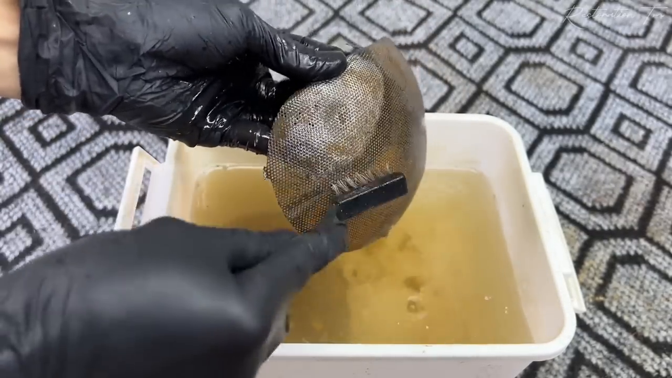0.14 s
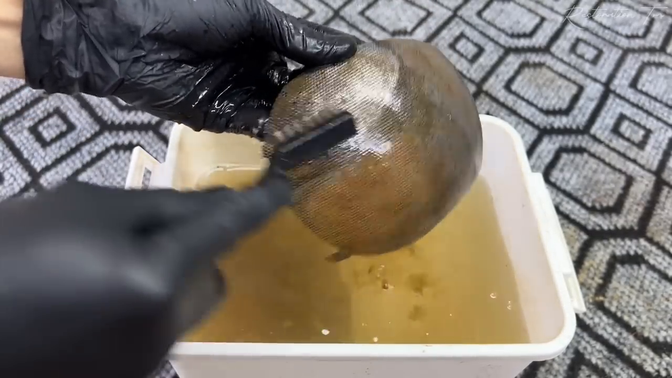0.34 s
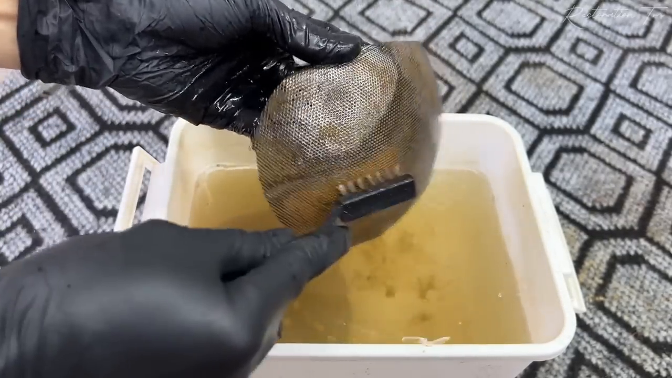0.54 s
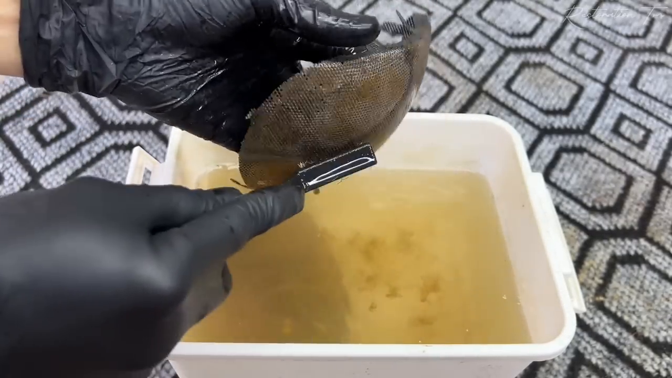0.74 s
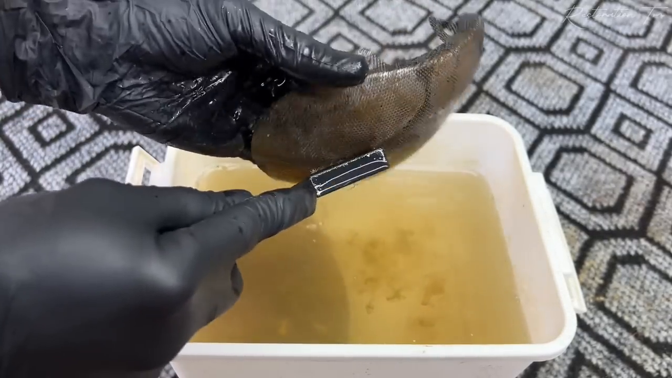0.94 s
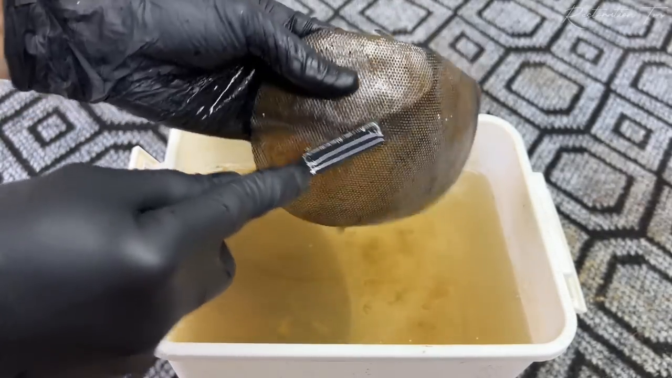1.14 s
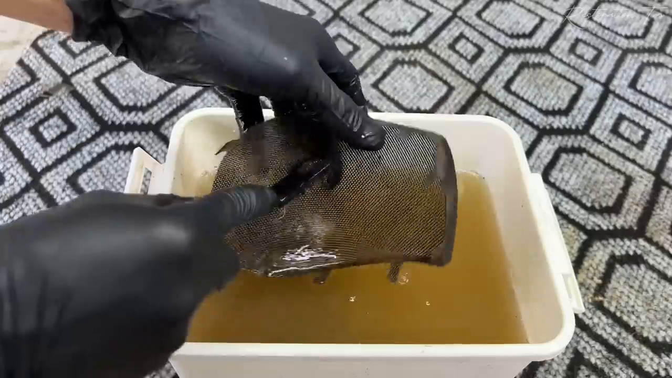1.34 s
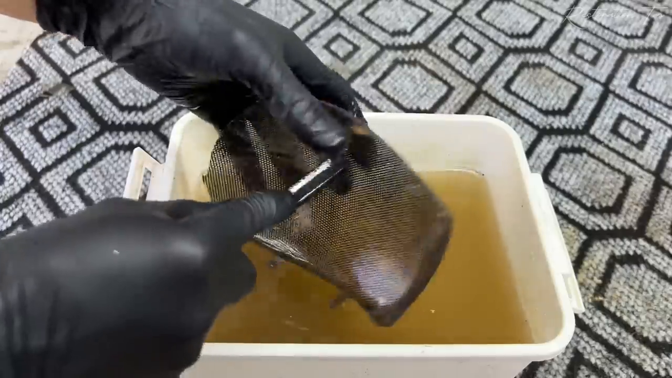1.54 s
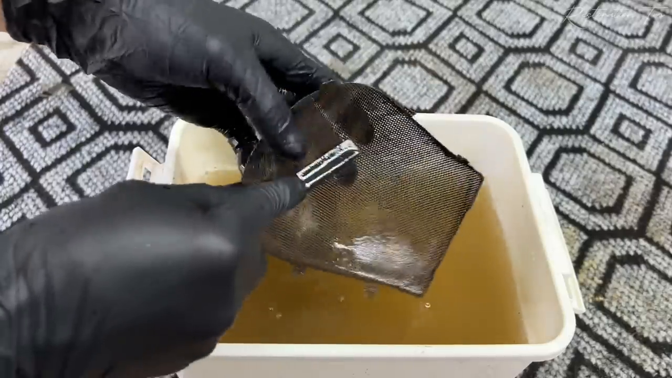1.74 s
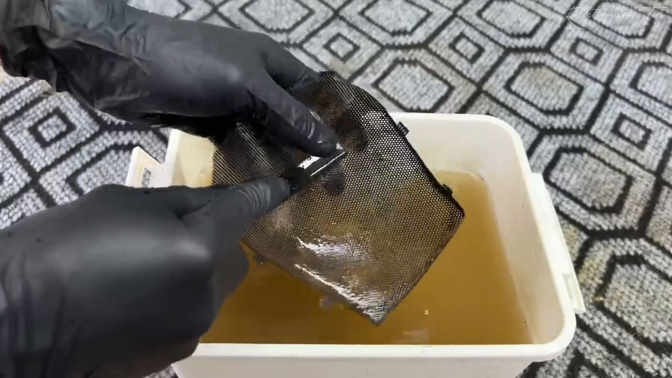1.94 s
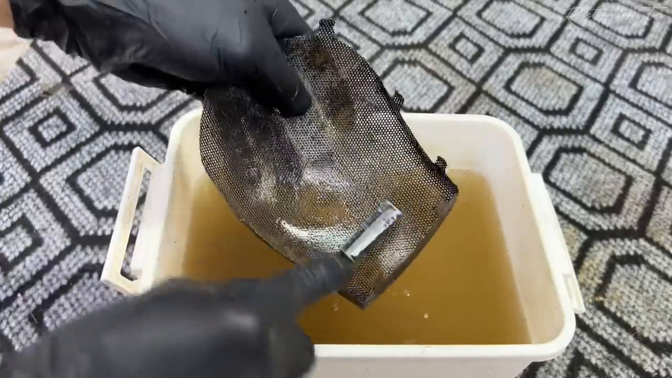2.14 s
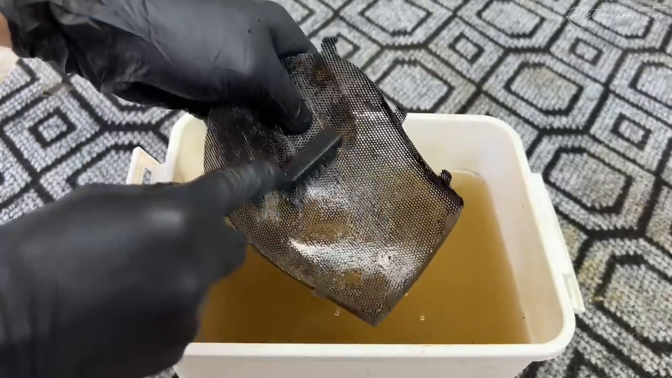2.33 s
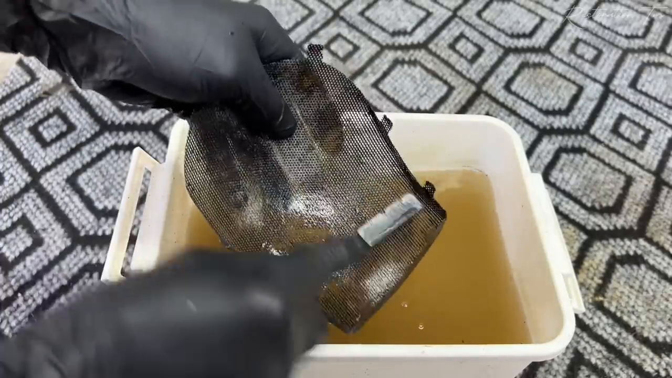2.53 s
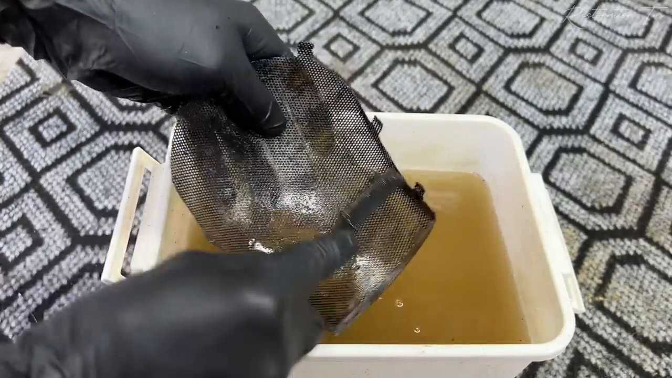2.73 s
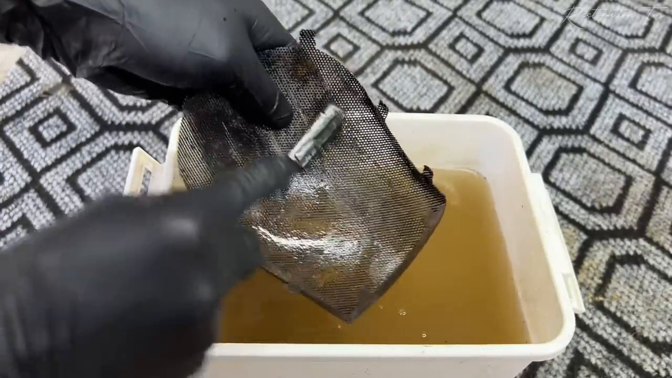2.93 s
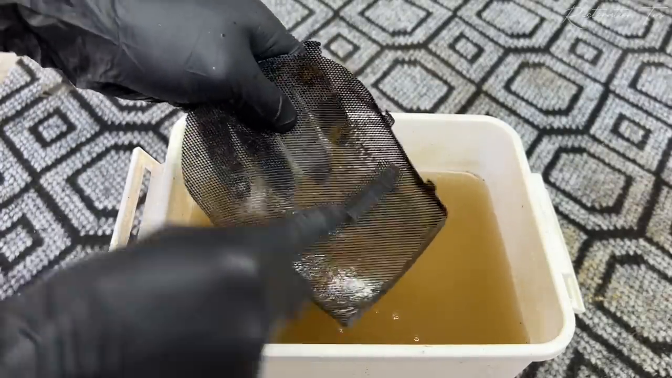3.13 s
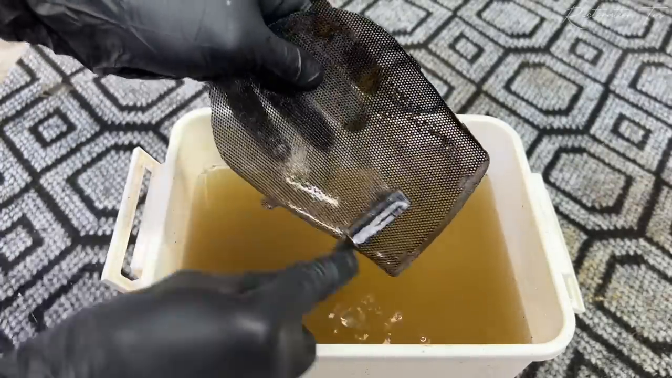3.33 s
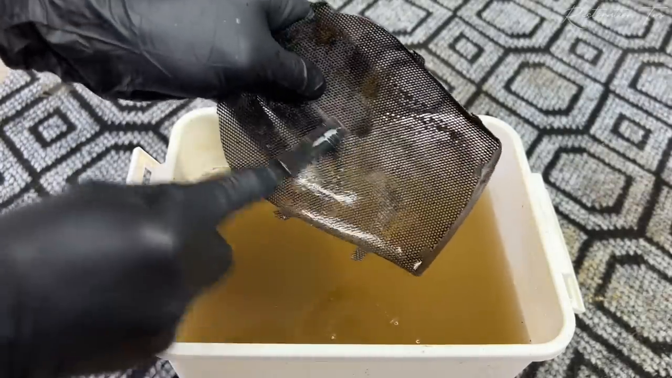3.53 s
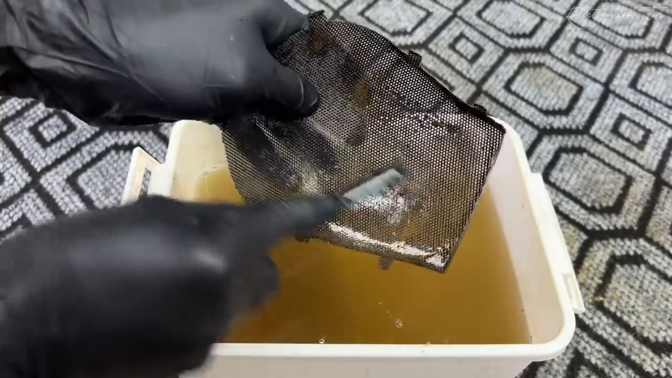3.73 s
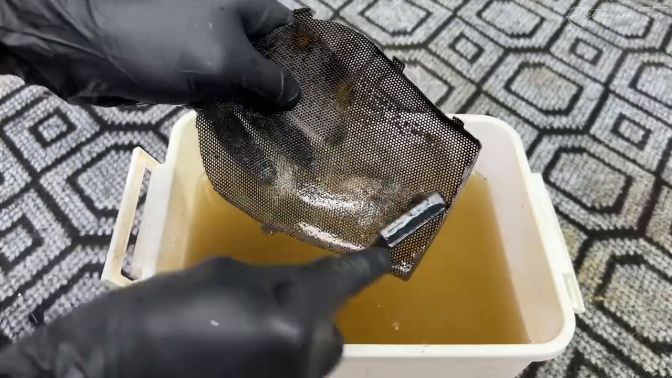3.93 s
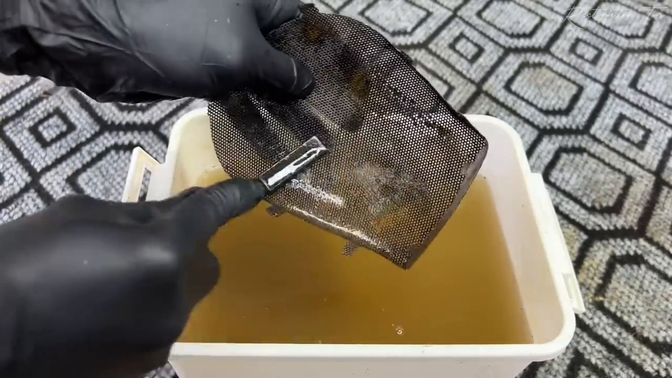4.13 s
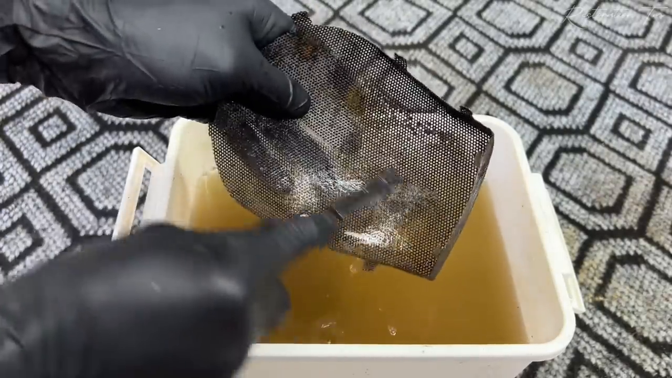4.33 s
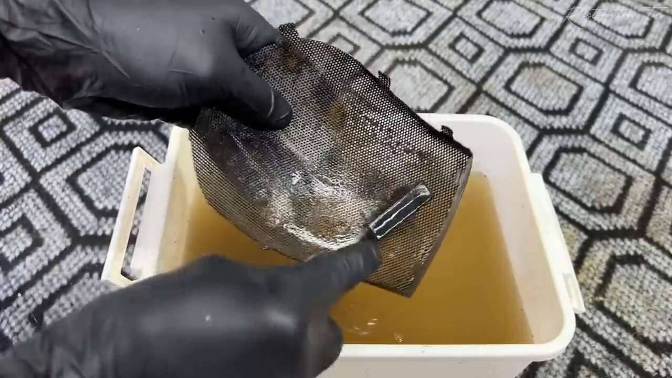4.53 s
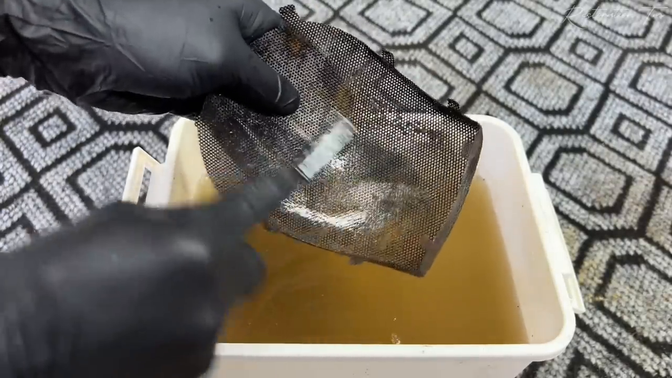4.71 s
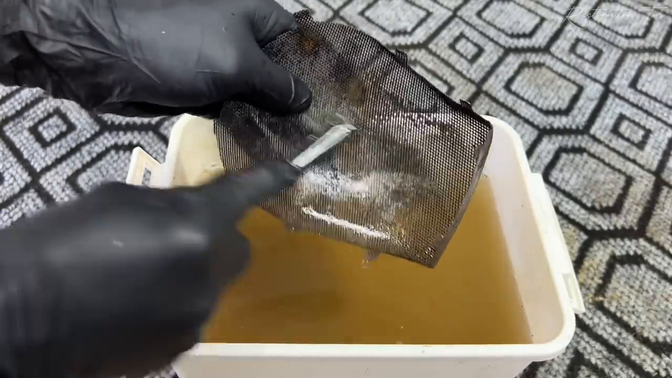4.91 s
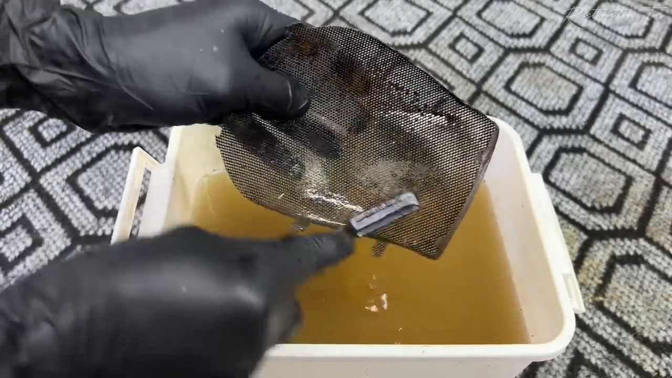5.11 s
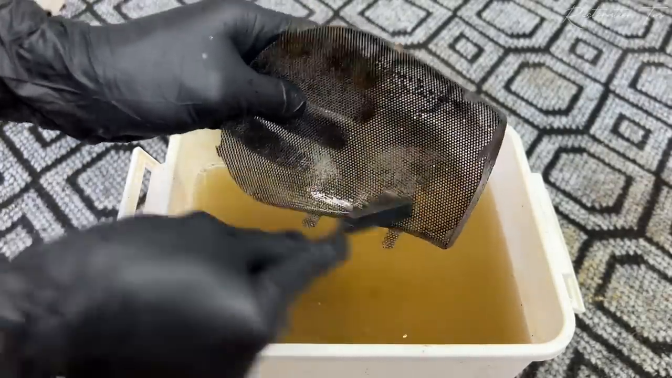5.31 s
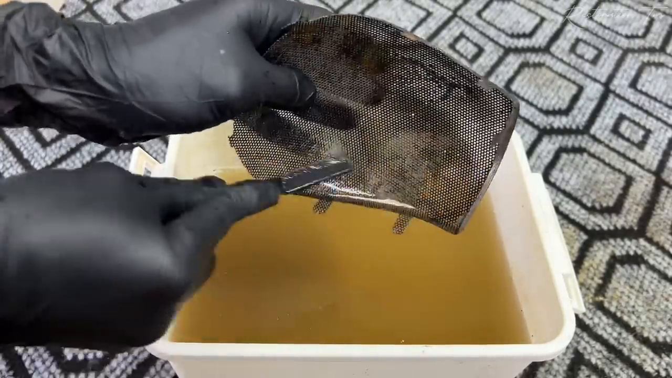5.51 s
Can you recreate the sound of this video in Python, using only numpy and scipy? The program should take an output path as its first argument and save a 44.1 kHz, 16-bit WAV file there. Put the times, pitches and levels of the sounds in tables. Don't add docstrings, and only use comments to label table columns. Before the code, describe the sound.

Bristles scrape wet wire mesh right beside the microphone: a few firm swishes, a lull of light touches and ticks with a tiny dropout, then a steady rapid back-and-forth rasp to the end. Each stroke is a thin, sizzling metallic burst with lower wet scrape underneath and sparse brush taps. Low steady hum and soft air fill the indoor background, with no obvious echo.

```python
import sys
import numpy as np
from scipy import signal
from scipy.fft import rfft, irfft, dct, next_fast_len
from scipy.io import wavfile
from scipy.ndimage import uniform_filter1d

SR = 44100
rng = np.random.default_rng(int(sys.argv[2]) if len(sys.argv) > 2 else 0)


def pcm_store(signal):
    levels = np.round(np.clip(np.atleast_2d(signal), -1, 1) * 32767)
    wavfile.write(sys.argv[1], SR, levels.astype(np.int16).T)


def convert_level_to_amplitude(level_db):
    exponent = np.asarray(level_db, float) / 20
    return 10 ** exponent


N = 245195
TIME = np.arange(N) / SR

# (time [s], level [dB])
MOTOR_HUM = [(0, -42.5), (.5, -44), (.82, -48), (1.25, -45), (1.4, -45.5), (1.7, -46.5), (2.3, -44),
             (2.45, -45.5), (2.75, -35.5), (3.05, -35), (3.41, -40), (3.67, -45.5), (3.81, -40),
             (3.92, -46.5), (4.17, -40), (4.6, -38.5), (5.25, -43.5), (5.56, -46)]
# (frequency [Hz], width [Hz], level [dB])
MOTOR_OVERTONES = [(149.9, 10, -57), (195.4, 40.5, -54), (263, 23, -58.5), (463.4, 22, -65.5),
                   (552, 21, -88)]
# (time [s], deeper engine level [dB], higher engine level [dB])
ENGINES = [(0, -49, -52.5), (1.2, -52.5, -48), (1.45, -46, -50), (2.2, -46.5, -47), (2.5, -51, -42.5),
           (2.8, -43.5, -47), (3.05, -44, -51), (3.45, -47.5, -44.5), (4.0, -42.5, -48.5),
           (4.6, -47.5, -40.5), (5.4, -40.5, -41.5)]
# (frequency [Hz], level per Hz [dB])
AIR_COLOUR = [(82, -31), (140, -2.5), (207, -6.5), (233, -33), (296, -3), (507, -15), (554, -12),
              (704, -17), (3600, -30), (5000, -33), (6500, -32), (11000, -120)]
# (time [s], level [dB], ring [Hz], second ring [Hz], time to fall 60 dB [s])
BRUSH_KNOCKS = [(.005, -38, 262, 205, 0.26), (1.249, -53, 1250, 3600, 0.026),
                (1.263, -40, 1235, 1290, 0.12), (1.2637, -45, 3790, 3640, .09),
                (1.264, -51, 4580, 4240, .12), (1.263, -44, 5400, 4900, .09), (1.266, -53, 2622, 3450, .1),
                (1.462, -46, 2900, 2520, 0.014), (1.595, -59, 1310, 5330, .03),
                (1.7, -53.5, 3900, 4500, 0.017), (2.7, -38.5, 2360, 3760, 0.079),
                (3.155, -40, 957, 788, 0.066), (3.742, -43, 2430, 1500, 0.083),
                (3.9134, -31.5, 1800, 2120, 0.06)]
# (time [s], level [dB])
BRISTLE_FLICKS = [(.33, -22), (.715, -49), (.787, -28.5), (.66, -45), (.884, -40), (.937, -46),
                  (1.041, -32), (1.164, -30), (1.263, -40), (1.395, -45), (1.473, -40), (1.492, -38),
                  (1.51, -40), (1.595, -33), (1.65, -32), (1.706, -42), (1.841, -41), (1.941, -47),
                  (2.7, -37.5), (3.241, -24), (3.399, -31), (3.527, -27), (3.698, -33), (3.71, -32),
                  (3.7405, -28), (3.9136, -21), (4.709, -30), (4.844, -35), (5.414, -29)]
# (time [s], level [dB])
EDGE_TAPS = [
    (3.7407, -35),
    (3.9139, -22),
]
# (time [s], wet scrape level [dB], brighter rasp over the scrape [dB])
FRAME_BITES = [(.07, -45.5, -5.5), (.13, -49, 1), (0.248, -48, 0.5), (0.398, -47.5, 0), (1.189, -54.5, 2),
               (1.47, -78, 12), (2.082, -50.5, -8), (2.29, -48, -19), (2.39, -50, -22), (2.571, -49, -4.5),
               (2.69, -50.5, -4), (2.85, -55, -3), (3.0, -52.5, 1), (3.16, -56, -13), (3.258, -50, -3),
               (3.422, -52.5, 2.5), (3.542, -48, -4), (3.73, -57, -5), (3.88, -48, -3), (4.07, -50.5, -2),
               (4.195, -55, -4), (4.32, -49.5, -13), (4.45, -54.5, -12), (4.61, -57, -15),
               (4.72, -51.5, -18.5), (4.86, -51.5, -12), (4.998, -51, 0.5), (5.144, -47, -1),
               (5.297, -48, 1), (5.46, -50.5, 2.5)]
# (frequency [Hz], level per Hz [dB])
SCRAPE_COLOUR = [(290, -5.5), (500, 1.5), (571, -13.5), (701, -2.5), (1150, 3.5), (1410, 1), (1700, -12),
                 (2210, -49), (3740, -120)]
# (frequency [Hz], level per Hz [dB])
RASP_COLOUR = [(1000, -54), (1700, -6.5), (1770, -2), (2330, 1), (2620, -4.5), (3150, -4.5), (4100, -33),
               (6930, -120)]
# (time [s], level [dB], time to fall 6 dB either side [s],
# tilt towards the shorter wires [dB per kHz])
SLACK_CROSSINGS = [(.26, -68.5, 0.5, -10), (.71, -57.5, 0.07, 3), (1.285, -55, 0.05, 7),
                   (1.715, -60, .015, 3), (1.86, -57, 0.04, -3), (2.121, -35, 0.0124, -8),
                   (2.22, -33, 0.033, -4), (2.425, -29, 0.03, -2), (2.516, -37, 0.0235, -4),
                   (2.58, -43, 0.03, -4), (2.691, -34, 0.0135, -3), (2.82, -48, 0.07, -8),
                   (3.01, -31.5, -0.0166, -6), (3.11, -39.5, 0.01, -4), (3.3, -37, .032, 1),
                   (3.41, -42, 0.02, 1), (3.591, -36.5, 0.03, -3), (3.719, -36, 0.0157, -1),
                   (3.89, -32, 0.0144, -7), (3.98, -36, 0.02, -9), (4.03, -36.5, 0.0259, -5),
                   (4.2, -47, 0.1, -1), (4.32, -41, .022, 6), (4.485, -33.5, 0, 6),
                   (4.579, -32, -0.0145, -3), (4.759, -34, .027, -2), (4.85, -36, .027, 3),
                   (5.02, -43, 0.04, 0), (5.13, -40, .03, 1), (5.32, -45, 0.03, -2), (5.459, -38, 0.02, -6),
                   (5.55, -47.5, 0.03, 0)]
# (frequency [Hz], width [Hz], level [dB])
LOOSE_WIRES = [(3330, 90, -4), (3480, 80, -4), (3680, 55, -1), (3850, 90, -5), (4040, 90, -5),
               (4175, 55, -3), (4300, 80, -4), (4440, 50, -1), (4580, 80, -2)]
# (start [s], length [s], pressure [dB], ringing zone at start [Hz], at end [Hz])
STEADY_STROKES = [(2.048, 0.12, -27, 5600, 5500), (2.225, 0.083, -24, 5170, 5800),
                  (2.368, 0.088, -21.5, 5900, 5900), (2.508, 0.073, -25.5, 5670, 10300),
                  (2.645, 0.092, -27.5, 6500, 5600), (2.802, 0.057, -29.5, 6150, 6500),
                  (2.93, 0.11, -22.5, 6040, 5600), (3.096, 0.094, -24.5, 5380, 6300),
                  (3.239, 0.082, -22, 6200, 5530), (3.397, 0.08, -23.5, 6040, 6200),
                  (3.522, 0.097, -21, 6600, 5500), (3.696, 0.08, -22, 5850, 6400),
                  (3.821, 0.089, -21.5, 5640, 5700), (4.005, 0.11, -23.5, 5700, 6800),
                  (4.167, 0.083, -25, 6330, 6100), (4.31, 0.066, -22, 5900, 6600),
                  (4.423, 0.092, -23, 6440, 5900), (4.576, 0.068, -23, 6400, 6600),
                  (4.699, 0.074, -22, 6560, 6000), (4.838, 0.084, -22.5, 6250, 6900),
                  (4.966, 0.084, -22, 6500, 5700), (5.112, 0.08, -23, 5770, 7000),
                  (5.243, 0.086, -25, 6700, 6000), (5.411, 0.092, -24, 5130, 6300)]
# (start [s], length [s], pressure [dB], ringing zone at start [Hz], at end [Hz])
LIGHT_STROKES = [(0.064, .095, -26, 5840, 5850), (0.208, 0.068, -26, 5800, 6150),
                 (0.375, .12, -26, 5930, 5800), (0.607, 0.15, -42, 5600, 5700),
                 (0.826, 0.12, -39.5, 5840, 5850), (1.056, 0.12, -39.5, 5760, 6000),
                 (1.156, 0.079, -31, 6150, 6600), (1.372, 0.056, -50, 6160, 5600),
                 (1.469, 0.043, -42, 6400, 6500), (1.565, 0.1, -35.5, 5370, 5700),
                 (1.7, 0.057, -37, 5550, 6000), (1.791, 0.075, -42, 5940, 5800),
                 (1.912, 0.041, -42.5, 5850, 5600), (5.543, 0.24, -22, 5960, 2360)]
# (time [s], level [dB])
RESTING_TOUCH = [(0, -29.5), (.2, -37), (.36, -32.5), (.56, -38.5), (.8, -46.5), (1.03, -53), (1.27, -47.5),
                 (1.5, -48.5), (1.75, -49.5), (1.96, -45), (2.16, -31.5), (2.62, -38.5), (3.2, -35),
                 (4.15, -35), (4.68, -34.5), (4.85, -32), (5.23, -35), (5.38, -42)]
# (time [s], change [dB])
HAND_SURGES = [(.035, -4.5), (.12, 1.5), (.165, 0.5), (.225, 1.5), (.33, 0), (.385, -0.5), (.47, 2),
               (.51, -1.5), (.66, 3), (.71, 1), (.77, -1), (.885, 3), (.94, 4.5), (1.0, 4), (1.3, 1),
               (1.34, 2.5), (1.395, 2.5), (1.5, 2.5), (1.6, 0), (1.65, 1), (1.78, 2), (1.845, 4), (2.0, 2),
               (2.085, 2.5), (2.165, -5.5), (2.21, 1), (2.33, -4), (2.385, -0.5), (2.47, 1), (2.57, -1),
               (2.67, 1), (2.73, 0), (2.9, -2.5), (3.04, -2), (3.12, 0.5), (3.265, 2), (3.345, 0),
               (3.39, -3.5), (3.49, -3), (3.56, 1.5), (3.61, 2), (3.67, -2), (3.72, 2.5), (3.8, -1),
               (3.9, 0), (3.94, -5), (4.08, 2.5), (4.15, 1), (4.27, -3), (4.4, 1), (4.51, 1.5), (4.66, 1),
               (4.81, -2), (4.855, 1), (4.92, 0), (5.08, -1), (5.18, 0.5), (5.22, -3), (5.32, 1.5),
               (5.52, 0.5)]
# (frequency [Hz], width [Hz], level [dB])
MESH_MODES = [(4800, 42, 5), (5025, 42, 5), (5190, 70, -3), (5330, 40, 1), (5600, 50, 0), (5780, 56, -1),
              (6020, 60, -1), (6440, 90, 2), (6720, 110, -2), (6880, 70, -3)]
# (time [s], tight low patch level [dB], wide upper patch level
# [dB])
SIDE_PATCHES = [(.1, -9.5, 4), (.45, -12, 3), (1.2, -1, 5), (1.6, 3, 3), (2.1, -1, 3), (2.26, 3, 3),
                (2.41, 6.5, 0), (2.55, 5.5, 2), (2.69, 11, 11), (2.98, 3, 7), (3.14, 4, 8), (3.28, 4, -11),
                (3.44, -2, 7), (3.57, 10, 5), (3.73, 14, -1), (3.86, 14, 1), (4.06, -4, 14), (4.2, 1, 7),
                (4.34, 9, 12), (4.47, 13, 16), (4.61, 15, 8), (4.74, 13, 16), (4.88, 15, 8), (5.01, -4, 16),
                (5.15, -2, 9.5), (5.29, 2, 15), (5.46, 3, 9)]
# (frequency [Hz], level per Hz [dB])
SNAP_COLOUR = [(2500, -22), (4400, -61), (4900, 1.5), (6500, 2.5), (8300, 0), (10000, -3), (11600, 0.5),
               (15600, -0.5), (16000, -60.5)]
# (frequency [Hz], share in the sum of the ports [ratio], share in their difference [ratio])
FAINT_LIMITS = [(300, .03, .05), (850, .05, .1), (1200, .08, .28), (1650, .23, .45), (2200, .37, .65),
                (3000, .58, .63), (4000, .48, .58), (5200, .15, .2), (6300, .1, .15), (7600, .15, .33),
                (9000, .28, .4), (11500, .2, .4), (16000, .28, .33)]
FULL_TREBLE_TIMES = [.79, 1.04, 1.23, 1.33, 1.5, 1.7, 2.35, 2.6, 3.24, 3.39, 3.48, 3.69, 3.78, 4.25, 4.3,
                     4.78]

SCENE_CHANGE_S, DIP_WIDTH_S = 1.2432, 0.0052
SCRAPE_DB, RASP_DB, LOOSE_DB = -28.5, -30, -33
SCRAPE_REST_DB, RASP_REST_DB = -67.5, -76.5
BITE_S = 0.029
SURGE_S = 0.011
LOW_PATCH_HZ, UPPER_PATCH_HZ = 4900, 8150
MERGE_HZ, TOP_HZ = 8000, 15850
ALIGN_HZ, TURN_HZ = 8300, 3700
LEFT_LEAD_S = 2e-5


def evened(x):
    return x / np.sqrt(np.mean(x ** 2) + 1e-20)


def columns(rows):
    s, *values = np.transpose(rows)
    return [np.interp(TIME, s, v) for v in values]


def coloured(x, points):
    hz, db = np.transpose(points)
    size = next_fast_len(N, True)
    gain = convert_level_to_amplitude(np.interp(np.log(np.fft.rfftfreq(size, 1 / SR) + 1), np.log(hz), db))
    return evened(irfft(rfft(x, size) * gain, size)[:N])


def ring(x, hz, width):
    r = np.exp(-np.pi * width / SR)
    return signal.lfilter([1 - r, 0, r - 1], [1, -2 * r * np.cos(2 * np.pi * hz / SR), r * r], x)


def drift(per_s):
    knots = rng.standard_normal(400)
    return np.interp(TIME * per_s, np.arange(400), knots)


def bristle_releases(per_s, spread_db):
    size = convert_level_to_amplitude(spread_db * np.minimum(rng.exponential(1, N), 3.2)) * rng.choice([-1., 1.], N)
    return evened(size * (rng.random(N) < per_s / SR))


def pair(a, b, same, left_db):
    same = np.clip(same, 0, 1)
    right = same * a + np.sqrt(1 - same ** 2) * b
    return np.array([a * convert_level_to_amplitude(left_db / 2), right * convert_level_to_amplitude(-left_db / 2)])


def humps(rows):
    t = np.arange(0, N + 64, 64) / SR
    power = sum(convert_level_to_amplitude(db - 5.28 * abs((t - s) / half_s) ** 1.17) ** 2 for s, db, half_s in rows)
    return np.interp(TIME, t, np.sqrt(power))


def steadied(x):
    return x / np.sqrt(abs(uniform_filter1d((x ** 2).mean(axis=0), size=6000)) + 1e-20)


def room():
    a, b = rng.standard_normal((2, N))

    def drone(hz, width, same):
        return steadied(ring(ring(pair(a, b, same, 2.0), hz, width), hz, width))

    motor_db, (deep_db, high_db) = columns(MOTOR_HUM)[0], columns(ENGINES)
    turns = np.cumsum(75 + 0.7 * drift(3)) / SR
    hum = np.sin(2 * np.pi * turns + np.array([[0], [0.7]])) * convert_level_to_amplitude(np.array([[2.2], [-2.2]]))
    out = convert_level_to_amplitude(motor_db) * (1.19 * hum + 0.57 * drone(79.3, 15.4, 0.83))
    double = np.sin(4 * np.pi * 0.995 * turns) * convert_level_to_amplitude(np.array([[0.8], [-0.8]]))
    out += convert_level_to_amplitude(-48.5 + 1.5 * drift(3.98)) * double
    out += convert_level_to_amplitude(deep_db) * drone(51.8, 31.1, 0.95) + convert_level_to_amplitude(high_db) * drone(104.7, 23.5, 1.0)
    out += sum(convert_level_to_amplitude(db) * drone(hz, width, 0.98) for hz, width, db in MOTOR_OVERTONES)

    air_db = -50.5 + 7.5 * np.exp(-TIME / 0.45) + 0.44 * drift(2.8)
    air_db -= 2 * (TIME > SCENE_CHANGE_S)
    air = pair(*(coloured(v, AIR_COLOUR) for v in (b, a)), 0.23, 0.82)
    return out + convert_level_to_amplitude(air_db) * air


def knocks():
    out, t = np.zeros(N), np.arange(6000) / SR
    for s, db, hz, second_hz, t60 in BRUSH_KNOCKS:
        rings = np.sin(2 * np.pi * hz * t) + 0.69 * np.sin(2 * np.pi * second_hz * t)
        rough = evened(uniform_filter1d(rng.standard_normal(len(t)), size=90))
        out[round(s * SR):][:len(t)] += convert_level_to_amplitude(db - 60 * t / t60) * rings * abs(1 + 0.37 * rough)
    for s, db in BRISTLE_FLICKS:
        bright = np.diff(rng.standard_normal(len(t) + 2), n=2)
        out[round(s * SR):][:len(t)] += convert_level_to_amplitude(db - 6.5) * bright * np.exp(-t / 0.0011)
    for s, db in EDGE_TAPS:
        late = t - 0.00098
        thud = np.sin(2 * np.pi * 1500 * late) * np.exp(-(late / 0.00026) ** 2)
        out[round(s * SR):][:len(t)] += convert_level_to_amplitude(db) * thud
    return out * convert_level_to_amplitude(np.array([[1.2], [-1.2]]))


def loose_wires(drive, tilt_db):
    out = 0
    for hz, width, db in LOOSE_WIRES:
        push = convert_level_to_amplitude(2.2 * drift(25) + tilt_db * (hz - 3900) / 1000) * drive
        out = out + convert_level_to_amplitude(db) * ring(push, hz, width) / np.sqrt(width)
    return out


def frame(force):
    scrape_bites = humps([(s, db, BITE_S) for s, db, _ in FRAME_BITES])
    rasp_bites = humps([(s, db + over_db, BITE_S) for s, db, over_db in FRAME_BITES])
    scraping = np.hypot(scrape_bites, convert_level_to_amplitude(SCRAPE_DB) * force) + convert_level_to_amplitude(SCRAPE_REST_DB)
    rasping = np.hypot(rasp_bites, convert_level_to_amplitude(RASP_DB) * force) + convert_level_to_amplitude(RASP_REST_DB)
    ringing = np.hypot(humps([row[:3] for row in SLACK_CROSSINGS]), convert_level_to_amplitude(LOOSE_DB) * force)

    grit = bristle_releases(3500, 2.2), bristle_releases(3500, 2.2)
    flutter = convert_level_to_amplitude(2.34 * drift(50))
    scrape = scraping * flutter * pair(*(coloured(g, SCRAPE_COLOUR) for g in grit), 0.8, 2.5)
    rasp = rasping * flutter * pair(*(coloured(g, RASP_COLOUR) for g in grit), 0.38, 1.3)

    tilt_db = columns([(s, tilt) for s, _, _, tilt in SLACK_CROSSINGS])[0]
    drives = bristle_releases(3000, 0.99), bristle_releases(4000, 1.8)
    wires = [loose_wires(drive, tilt_db) for drive in drives]
    stiff = [(2900, -24), (3450, 0), (9000, 0)]
    return scrape + rasp + ringing * pair(*(coloured(w, stiff) for w in wires), 0.7, 1.9)


def brush_pressure():
    power = convert_level_to_amplitude(columns(RESTING_TOUCH)[0] - 4.5 + 0.5 * drift(9.1)) ** 2
    strokes = sorted(list(STEADY_STROKES) + list(LIGHT_STROKES))
    zone = []
    for s, length, db, start_hz, end_hz in strokes:
        near = slice(max(round((s - length) * SR), 0), round((s + 2 * length) * SR))
        u = 2 * (TIME[near] - s) / length - 1
        steep = np.where(u < 0, 6.5, 2.6)
        lean_db = 0.5 * np.clip(u, -1, 1)
        power[near] += convert_level_to_amplitude(db - 4.0 + lean_db - 7.2 * abs(u) ** steep) ** 2
        zone += [(s + 0.25 * length, start_hz), (s + 0.75 * length, end_hz)]
    surge_db = sum(db * np.exp(-((TIME[::32] - s) / SURGE_S) ** 2) for s, db in HAND_SURGES)
    return np.sqrt(power) * convert_level_to_amplitude(surge_db.repeat(32)[:N]), columns(zone)[0]


def mesh(force, zone_hz):
    force = force * convert_level_to_amplitude(1.34 * drift(60) + 0.63 * drift(45))
    strength = np.sqrt(np.mean(force ** 2))
    many_hz = np.linspace(4720, 9300, num=32) + 60 * rng.standard_normal(32)
    many = [(hz, 45., -3 - (hz - 4700) / 700) for hz in many_hz]
    snaps = force * bristle_releases(7500, 1.9)
    rings, power = np.zeros((2, N)), 0
    low_db, upper_db, zone_hz = (v[::32] for v in (*columns(SIDE_PATCHES), zone_hz))
    for hz, width, db in list(MESH_MODES) + many:
        under_brush_db = 17 * np.exp(-((hz - zone_hz) / 600) ** 2)
        low_patch_db = 1.34 * low_db * np.exp(-((hz - LOW_PATCH_HZ) / 260) ** 2)
        upper_patch_db = 1.2 * upper_db * np.exp(-((hz - UPPER_PATCH_HZ) / 550) ** 2)
        near_db = np.maximum(under_brush_db, low_patch_db)
        gain = convert_level_to_amplitude(db + near_db + upper_patch_db + 4.5 * drift(22)[::32])
        mode = ring(snaps * gain.repeat(32)[:N], hz, width) / np.sqrt(width)
        power += gain ** 2
        rings[0] += mode
        rings[1] += np.roll(mode, rng.integers(0, 9)) * convert_level_to_amplitude(-6 + 3 * rng.standard_normal())
    rings /= np.sqrt(uniform_filter1d(power, size=12)).repeat(32)[:N]
    rings *= strength / np.sqrt(np.mean(rings ** 2))
    other_snaps = force * bristle_releases(6300, 2.2)
    bare = pair(coloured(snaps, SNAP_COLOUR), coloured(other_snaps, SNAP_COLOUR), 0.58, 2.7)
    return convert_level_to_amplitude(-4.0) * rings + convert_level_to_amplitude(-4.5) * strength * bare


def scene():
    dip = 1 - np.exp(-((TIME - SCENE_CHANGE_S) / DIP_WIDTH_S) ** 4)
    force, zone_hz = brush_pressure()
    return (room() + knocks() + frame(force) + mesh(force, zone_hz)) * dip


def lose_faint_detail(x, kept, column):
    window = np.sin(np.pi * (np.arange(2048) + 0.5) / 2048)
    hops = x[:len(x) // 1024 * 1024].reshape(-1, 1024)
    a, b, c, d = np.split(np.hstack([hops[:-1], hops[1:]]) * window, 4, axis=1)
    tones = dct(np.hstack([-c[:, ::-1] - d, a - b[:, ::-1]]), type=4, norm="ortho")
    table = np.transpose(FAINT_LIMITS)
    share = np.interp(np.arange(1024) * SR / 2048, table[0], table[column])
    luck = uniform_filter1d(rng.standard_normal((len(tones), 256)), size=3, axis=0)
    luck = evened(luck).repeat(4, axis=1)
    silent = uniform_filter1d(luck, size=6, axis=1) * 1.2 > 3.2 - 3.7 * share
    share = np.where(silent, 99, share * convert_level_to_amplitude(-2.5 + 4 * luck))
    kept = np.pad(kept[:1024, 1:].T, ((0, len(tones)), (0, 0)))[:len(tones)]
    local = np.sqrt(abs(uniform_filter1d(tones ** 2, size=21, axis=1)))
    audible = tones * kept * (abs(tones) > share * local)
    p, q = np.split(dct(audible, type=4, norm="ortho"), 2, axis=1)
    blocks = np.hstack([q, -q[:, ::-1], -p[:, ::-1], -p]) * window
    out = np.zeros((len(hops), 1024))
    out[:-1] += blocks[:, :1024]
    out[1:] += blocks[:, 1024:]
    return out.ravel()


def top_cut(x):
    return signal.sosfilt(signal.butter(12, 17110, fs=SR, output="sos"), x)


def record(dry):
    lead = 936
    frames = dict(fs=SR, window="cosine", nperseg=2048, noverlap=1024)
    hz, t, (left, right) = signal.stft(np.pad(dry, ((0, 0), (lead, 0))), **frames)
    hz = hz[:, None]
    half = np.pi * (hz - ALIGN_HZ) / TURN_HZ
    limits = [[0.58], [0.31]] + [[0.07], [0.1]] * rng.standard_normal((len(t), 2)).T
    limits[:, np.round((np.array(FULL_TREBLE_TIMES) * SR + lead) / 1024).astype(int)] = 0
    shifted = half[np.arange(len(hz)) // 16 * 16 + (hz[:, 0] < TOP_HZ) * 8] - 0.03
    strong = abs(np.array([np.cos(shifted), np.sin(shifted)])) > limits[:, None]
    kept = strong | (hz < 9000)

    early = left * np.exp(2j * np.pi * hz * LEFT_LEAD_S)
    total, gap = np.cos(half), np.sin(half) * (hz < 15250)
    share = np.clip((hz - MERGE_HZ) / 900 + 0.5, 0, 1) * (hz < TOP_HZ)
    below = (1 - share) * (hz < TOP_HZ) / 2
    mid = below * (early + right) + share * total * left
    side = below * (early - right) - 1j * share * gap * (0.5 * left + 0.78 * right)
    both = np.pad(signal.istft(np.array([mid, side]), **frames)[1], ((0, 0), (0, 2048)))
    mid = lose_faint_detail(both[0], kept[0], column=1)
    side = lose_faint_detail(both[1], kept[1], column=2)
    mix = np.array([mid + side, mid - side])[:, lead:lead + N]
    return top_cut(mix)


dry = scene()
out = record(dry)
pcm_store(out)
```